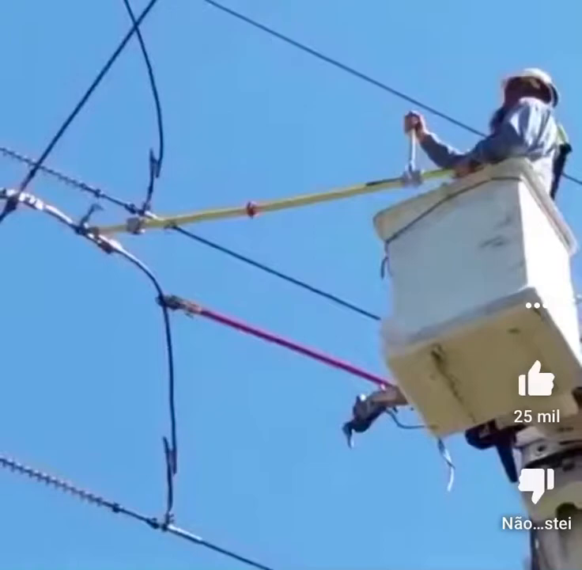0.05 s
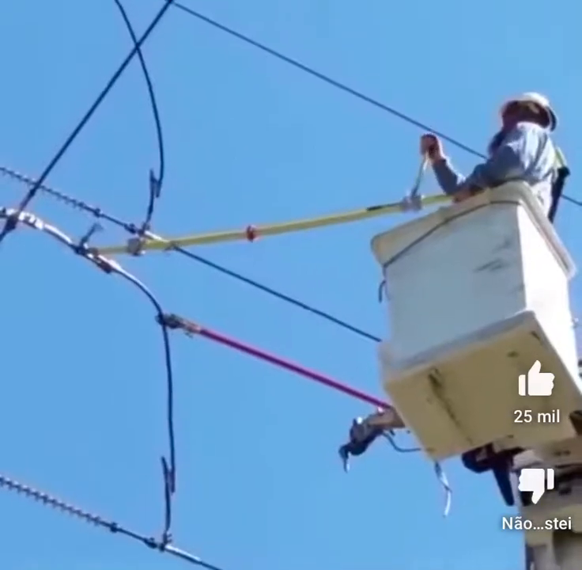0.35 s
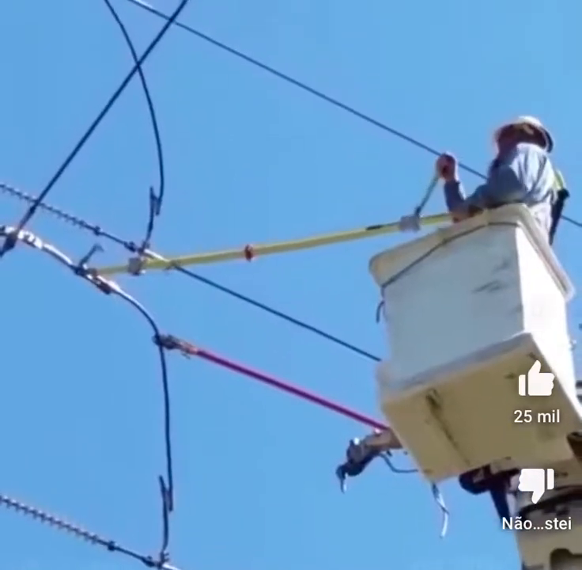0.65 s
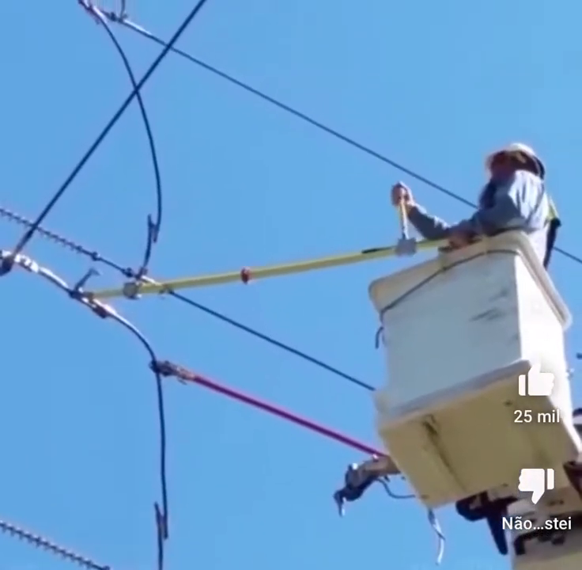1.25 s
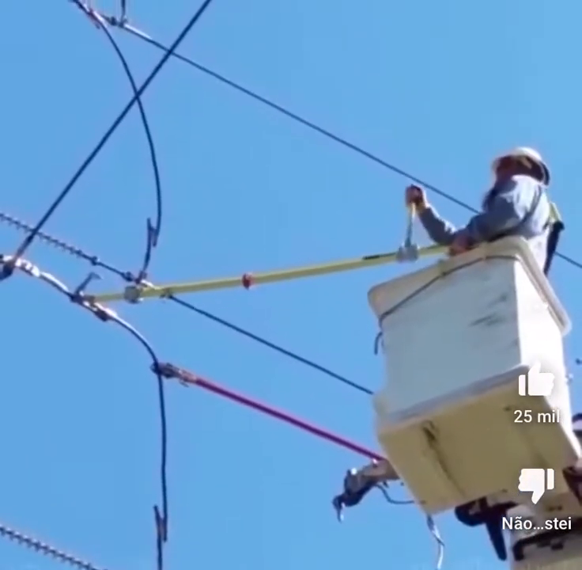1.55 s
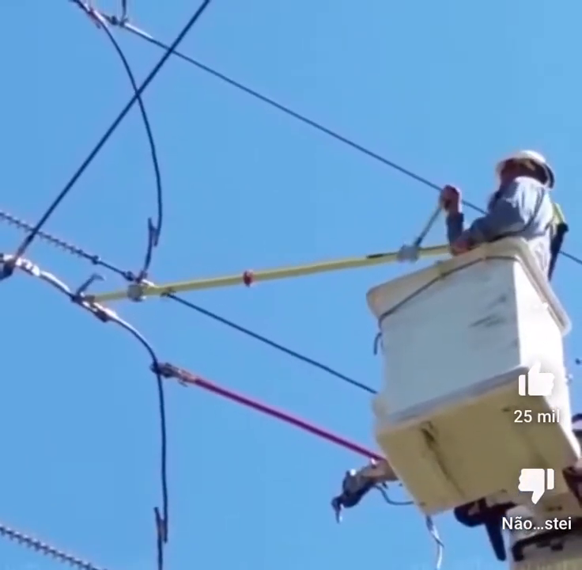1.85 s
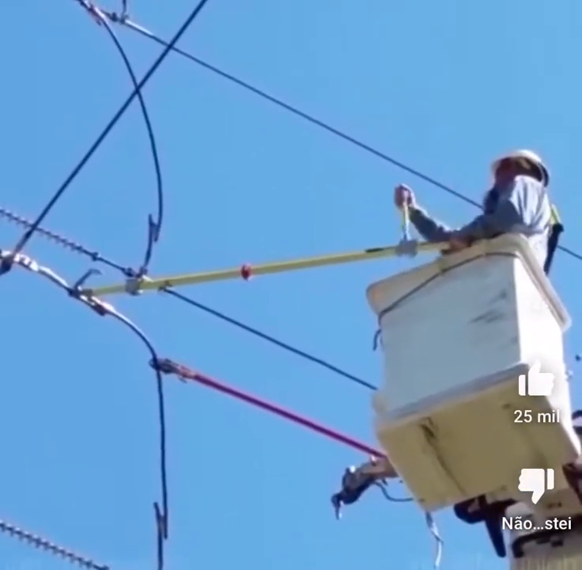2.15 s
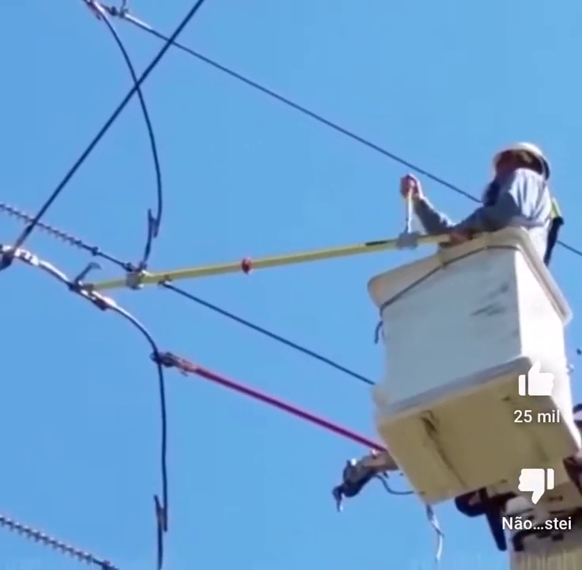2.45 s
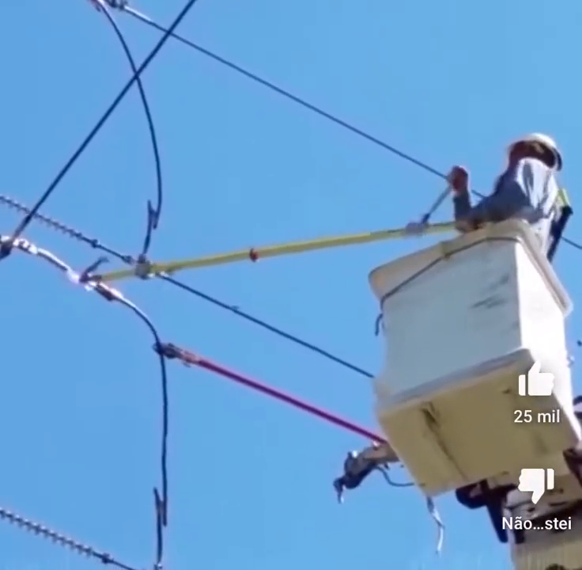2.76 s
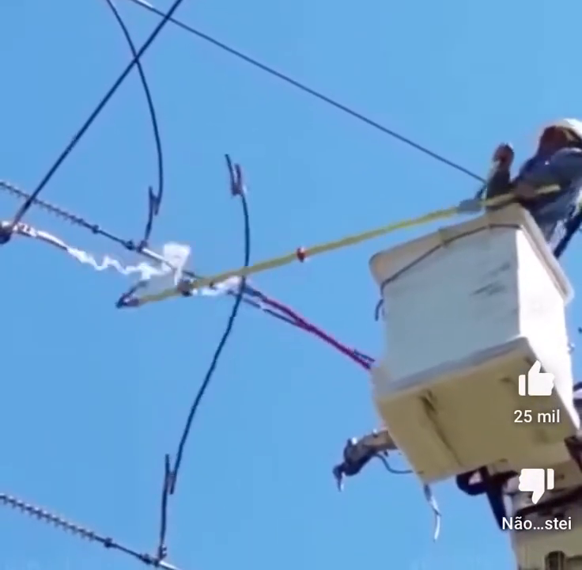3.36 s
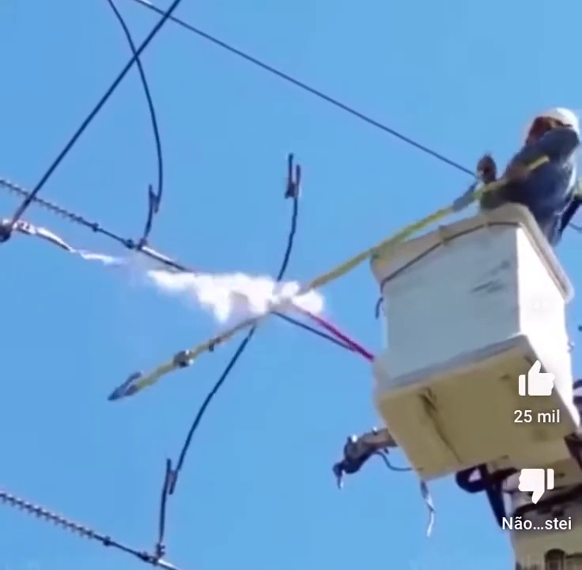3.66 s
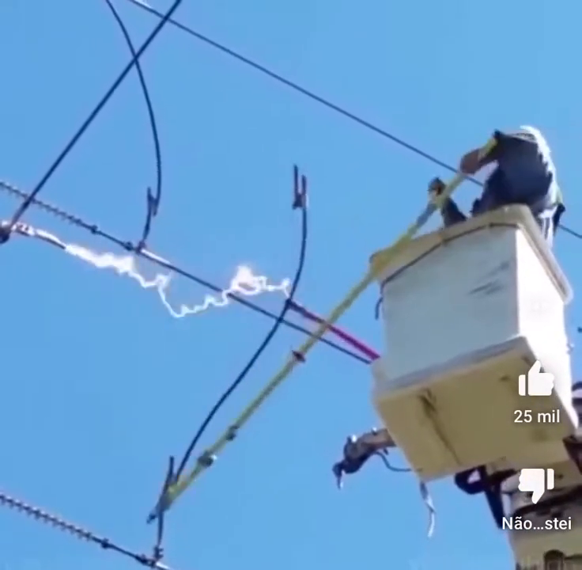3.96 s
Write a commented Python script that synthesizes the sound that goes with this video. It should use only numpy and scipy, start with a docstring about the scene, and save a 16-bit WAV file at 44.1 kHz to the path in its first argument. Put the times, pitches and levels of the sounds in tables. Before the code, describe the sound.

A loud, crackling electric arc breaks out on a power line, heard from the street below. Before it come an idling truck's rumble, scattered sharp spark snaps and low wind bumps on the microphone; the rumble fades beneath the buzz.

```python
"""A truck's engine idles, a low pulsing rumble. From its bucket a lineman pulls open a live overhead
switch with a long pole: small sparks snap at the contact and wind bumps the microphone.
Then an arc catches with a growl and is drawn out, and the rumble recedes beneath it.
The arc re-strikes on every half cycle of the mains. Each strike heats the air into a pressure pulse,
and the buzz of these pulses spreads into a sizzle as the crooked channel lengthens."""
import sys
import numpy as np
from scipy import signal
from scipy.fft import rfft, irfft, next_fast_len
from scipy.io import wavfile
from scipy.ndimage import map_coordinates

SR = 44100
rng = np.random.default_rng(int(sys.argv[2]) if len(sys.argv) > 2 else 0)


def store_pcm(level_fs):
    """Save levels as 16-bit WAV."""
    pcm = np.round(np.clip(level_fs, -1, 1) * 32767).astype(np.int16)
    wavfile.write(sys.argv[1], SR, np.atleast_2d(pcm).T)


N = 176400

# Levels in the tables are relative; each source adds its own gain.
# Envelopes of the arc's four parts: t/s, hum/dB, buzz/dB, rasp/dB, sizzle/dB
ARC_LEVELS = [(2.93, -27.5, -53, -31, -46.5), (2.97, -22, -35.5, -47, -55),
              (3.005, -26.5, -21.5, -38.5, -72), (3.038, -22, -26, -31.5, -51),
              (3.052, -32, -29.5, -30.5, -27), (3.125, -37, -31.5, -25, -24.5),
              (3.168, -33, -32, -38, -29.5), (3.19, -49, -46, -43, -33.5),
              (3.265, -34.5, -35, -31.5, -27.5), (3.39, -36, -37, -33, -26.5),
              (3.54, -39, -34.5, -32.5, -23), (3.58, -45, -45, -37.5, -29.5),
              (3.68, -35, -48, -34.5, -26.5), (3.745, -30, -47, -31, -21),
              (3.81, -33.5, -40.5, -32.5, -24.5), (4, -33.5, -34.5, -34.5, -28)]
# The lengthening channel: t/s, advance of the strikes/ms, spread of arrivals/ms, polarity bias/dB
ARC_CHANNEL = [(2.96, 1, .6, 0), (3.046, 0, .6, 0), (3.12, 0, .85, 0), (3.28, 2.2, .95, 0),
               (3.52, 3.1, 1.1, 0), (3.62, 4.4, 1.7, 0), (3.74, 5, 1.6, .3), (3.8, 5.1, 1.7, 1.6),
               (4, 5.3, 2, .8)]
# Spectra of the arc's low, middle and high bands: f/Hz, level/dB
BUZZ_SPECTRUM = [(100, -62), (170, -7), (237, 4), (355, -3.5), (470, -6.5), (590, -9.5), (900, -12),
                 (1500, -21), (3000, -43)]
RASP_SPECTRUM = [(250, -7.5), (500, -6.5), (750, -6.5), (1450, -2), (2000, -5.5), (2500, -9), (3000, -22),
                 (4500, -26)]
SIZZLE_SPECTRUM = [(2000, -39), (3100, -13.5), (3900, -2.5), (4700, -1.5), (5500, -4), (6050, -12),
                   (6900, -4), (7600, -7.5), (8300, 4.5), (9000, 0.5), (9600, -6.5), (11200, 2.5),
                   (12200, -14)]
# The hardest strikes, which crack out of the sizzle: t/s, level/dB
HARD_STRIKES = [(3.0448, -5), (3.514, -12), (3.531, -12), (3.657, -14), (3.791, -10), (3.89, -13)]
# Stereo image of the discharges and their echoes: f/Hz, left-right correlation
ARC_CORRELATION = [(2400, .94), (2950, -.1), (3900, .7), (7200, .4), (9500, -.3), (11000, -.1)]
# Sparks at the contact, the last row an early strike of the catching arc: t/s, level/dB, midrange against
# treble/dB, decay time T60/s
SPARK_EVENTS = [(0.55, -37.5, -28, 0.072), (0.6531, -30.5, -25, 0.041), (1.0482, -26, -16, 0.031),
                (1.0595, -29.5, -14, 0.025), (1.1863, -30.5, -15.5, 0.072), (1.8326, -28.5, -10, 0.037),
                (1.842, -32, -11, .018), (1.876, -34, -11, 0.095), (2.2664, -24.5, -8, 0.021),
                (2.3274, -23.5, -13, 0.03), (2.782, -36.5, -11, 0.18), (2.8213, -29, -12, 0.022),
                (2.854, -32.5, -6.5, 0.12), (2.878, -26, -9.5, 0.081), (2.892, -24, -12, 0.1),
                (2.9274, -35.5, 5.5, 0.028), (3.019, -24, -14, 0.0068)]
# Spectra of a spark's treble snap and midrange body: f/Hz, level/dB
SNAP_SPECTRUM = [(1800, -43), (3000, -1.5), (4700, 0.5), (6200, -8.5), (7800, -2.5), (8600, 7.5), (9800, 2),
                 (11200, -4.5), (12500, -6)]
BODY_SPECTRUM = [(300, -29), (700, -10), (1900, -1.5), (2800, -9), (4000, -39)]
# Gusts at the microphone: t/s, level/dB
GUST_LEVELS = [(2.1, -41), (2.25, -34), (2.29, -20), (2.32, -45), (2.36, -21.5), (2.40, -45), (2.46, -22),
               (2.55, -30), (2.64, -35.5), (2.71, -23.5), (2.75, -15.5), (2.775, -30.5), (2.83, -28.5),
               (2.9, -24), (3.02, -51), (3.3, -38.5), (3.4, -76)]
# Spectrum of the wind: f/Hz, level/dB
WIND_SPECTRUM = [(15, 1.5), (35, -10), (75, 6.5), (130, -2), (250, -9), (500, -44), (1500, -61)]
# Envelope of the engine, receding under the arc: t/s, level/dB
ENGINE_LEVELS = [(0, 1.5), (2.5, 0.5), (2.9, -1.5), (3.02, 2.5), (3.07, -18), (4, -21)]
# Exhaust tones: multiple of the firing rate, level/dB
EXHAUST_HARMONICS = [(2, -34), (3, -37.5), (4, -43.5), (5, -47.5)]
# Spectrum of the engine's noise: f/Hz, level/dB
CLATTER_SPECTRUM = [(25, -18), (55, -3.5), (120, -7.5), (200, -13), (420, -20.5), (700, -18), (950, -22),
                    (1150, -21.5), (2000, -28), (2600, -35), (3700, -39.5), (6500, -48), (9200, -54),
                    (10400, -40.5), (12000, -56)]
# Stereo image of the engine's noise: f/Hz, left-right correlation
CLATTER_CORRELATION = [(440, .9), (700, .7), (1050, .1), (1500, -.8), (2200, .62), (2900, -.8), (3900, .45),
                       (5000, 0)]

CATCH_S, CATCH_RISE_S = 2.9, 0.014
STRIKE_S, STRIKE_HZ = 3.0457, 118.5  # first full strike, nominal re-strike rate


def arc():
    """Thermal expansion: each strike pushes the air (hum, buzz) and cracks along it (rasp, sizzle)."""
    k, times = strikes()
    t = np.arange(N) / SR
    hum_db, buzz_db, rasp_db, sizzle_db = curves(ARC_LEVELS)
    alight = np.clip((t - CATCH_S) / CATCH_RISE_S, 0, 1)
    burn = lambda x, db: alight * amp(db) * x / np.std(x[..., t > STRIKE_S])
    hum = burn(-np.sin(2 * np.pi * np.interp(t, times, k)), hum_db - 5.5)
    buzz = burn(coloured(heat_pulses(k, times), BUZZ_SPECTRUM), buzz_db - 3)
    coarse = np.array([kink_clicks(k, times, writhe=0.095, jitter=0.095, count=40) for _ in range(2)])
    fine = np.array([kink_clicks(k, times, writhe=0.043, jitter=0.025, count=60) for _ in range(2)])
    rasp = burn(stereo(coloured(coarse, RASP_SPECTRUM), ARC_CORRELATION), rasp_db + 0.5)
    sizzle = burn(stereo(coloured(fine, SIZZLE_SPECTRUM), ARC_CORRELATION), sizzle_db)
    crack_times, crack_db = np.transpose(HARD_STRIKES)
    cracks = coloured(bursts(crack_times, crack_db - 1, rise_s=0.00068, t60_s=.01), SIZZLE_SPECTRUM)
    crackle = street_echoes(rasp + sizzle + cracks, wet_db=-3)
    return hum + buzz + patchy(crackle, depth_db=1.8, bins=9)


def strikes():
    """Re-ignition: index and time of each half cycle's strike; a longer arc is less punctual."""
    k = np.arange(-20, 120)
    times = STRIKE_S + k / STRIKE_HZ
    early_ms, spread_ms, _ = curves(ARC_CHANNEL, times)
    stray_ms = .6 * np.maximum(spread_ms - 1, 0) * rng.standard_normal(len(k))
    return k, times + (stray_ms - early_ms) / 1000


def heat_pulses(k, times):
    """Sudden heating radiates one pressure pulse a strike, wider as the channel lengthens."""
    spread_s = curves(ARC_CHANNEL, times)[1] / 1000
    jitter_s = .28 * spread_s * np.clip(k / 30, .4, 1)
    when = times + jitter_s * rng.standard_normal(len(k))
    size = -amp(1.2 * rng.standard_normal(len(k)))
    smear_s = .4 * spread_s
    return clicks(when - smear_s, size) + clicks(when, 2 * size) + clicks(when + smear_s, size)


def kink_clicks(k, times, writhe, jitter, count):
    """Superposition: each kink clicks with its own delay; kinks drift, so successive strikes are alike."""
    def drift():
        noise = rng.standard_normal((count, len(k) + 23))
        return unit(signal.fftconvolve(noise, np.hanning(24)[None], "valid"))
    _, spread_ms, polarity_db = curves(ARC_CHANNEL, times)
    place = rng.standard_normal((count, 1)) + writhe * drift()
    delay_ms = spread_ms * (place + jitter * rng.standard_normal(place.shape))
    scatter_db = 3.5 * rng.standard_normal(place.shape)
    flicker_db = 1.6 * rng.standard_normal(len(k))
    size_db = scatter_db + flicker_db - polarity_db * (-1.) ** k
    return clicks(times + delay_ms / 1000, np.tanh(2 * drift()) * amp(size_db))


def sparks(rise_s=0.00055):
    """Dielectric breakdown: the air snaps as the pole's hook works at the live contact, and once more as the
    catching arc strikes early."""
    times, db, body_db, t60_s = np.transpose(SPARK_EVENTS)
    snap = coloured(bursts(times, db - 2, rise_s, t60_s), SNAP_SPECTRUM)
    body = coloured(bursts(times, db + body_db + 1, rise_s, t60_s), BODY_SPECTRUM)
    return street_echoes(snap + body, wet_db=-7)


def wind():
    """Turbulence: pressure fluctuations at the microphone make low bumps."""
    level_db, = curves(GUST_LEVELS)
    turbulence = coloured(rng.standard_normal((2, N)), WIND_SPECTRUM)
    return amp(level_db) * stereo(turbulence, correlation=[(60, 0.23)])


def engine(firing_hz=30.87):
    """Periodic excitation: the idling truck's firings give exhaust harmonics and modulate its noise."""
    level_db, = curves(ENGINE_LEVELS)
    phase = 2 * np.pi * np.cumsum(firing_hz * (1 + 0.01566 * wobble(9))) / SR
    exhaust = np.zeros(N)
    for harmonic, db in EXHAUST_HARMONICS:
        peak = np.sqrt(2) * amp(db - 3 + 2.2 * wobble(13))
        exhaust += peak * np.cos(harmonic * phase + rng.uniform(0, 2 * np.pi))
    noise = stereo(coloured(rng.standard_normal((2, N)), CLATTER_SPECTRUM), CLATTER_CORRELATION)
    clatter = patchy(noise, depth_db=1.5, bins=11) * amp(-33.5 + 0.8 * wobble(7.28))
    pulsing = 1 + 0.098 * np.cos(phase)
    return amp(level_db) * (exhaust + clatter * pulsing)


def street_echoes(x, wet_db, near_t60_s=0.034, far_t60_s=0.43):
    """Reflection: the truck and the ground add quick echoes, followed by a faint longer tail."""
    t = np.arange(SR // 2) / SR
    decay = amp(-60 * t / near_t60_s) + amp(-12.5 - 60 * t / far_t60_s)
    tail = stereo(rng.standard_normal((2, N)), ARC_CORRELATION)[:, :len(t)] * decay * (t > .003)
    return x + amp(wet_db) * signal.fftconvolve(x, tail / np.linalg.norm(tail[0]), axes=1)[:, :N]


def bursts(times, levels_db, rise_s, t60_s):
    """Exponential decay: a ragged puff of stereo noise dies away from each onset."""
    age = np.maximum(np.arange(N) / SR - times[:, None], 0)
    fall_db = np.minimum(60 * age / np.reshape(t60_s, (-1, 1)), 200)
    envelopes = (1 - np.exp(-age / rise_s)) * amp(levels_db[:, None] - fall_db)
    ragged_db = 4 * map_coordinates(rng.standard_normal(N // 64), [np.arange(N) / 80], order=1)
    return envelopes.sum(0) * unit(amp(ragged_db)) * stereo(rng.standard_normal((2, N)), ARC_CORRELATION)


def clicks(times, sizes):
    """Sinc interpolation places impulses between samples."""
    at = times.reshape(-1, 1) * SR
    taps = np.floor(at).astype(int) + np.arange(-7, 9)
    kernel = np.sinc(taps - at) * np.sinc((taps - at) / 8)
    return np.bincount(taps.ravel(), (kernel * sizes.reshape(-1, 1)).ravel(), N)[:N]


def patchy(x, depth_db, bins):
    """Spectral modulation: the colour wanders in random patches of frequency and time."""
    spectra = signal.stft(x, nperseg=512)[2]
    patch = np.outer(np.hanning(bins), np.hanning(34))
    field = signal.fftconvolve(rng.standard_normal(spectra.shape[1:]), patch, "same")
    gain = amp(depth_db * unit(field))
    gain[:8] = 1  # the bass stays steady
    return signal.istft(spectra * unit(gain), nperseg=512)[1][:, :N]


def stereo(pair, correlation):
    """Mid-side mixing gives two independent signals a set correlation, at rms 1."""
    angle = lambda hz: np.arccos(np.clip(along(correlation, hz), -1, 1)) / 2
    mid, side = filtered(pair, lambda hz: np.array([np.cos(angle(hz)), np.sin(angle(hz))]))
    return unit(np.array([mid + side, mid - side]))


def coloured(x, spectrum):
    """Minimum-phase filtering shapes x causally and keeps the power of white noise."""
    def response(hz):
        magnitude = np.maximum(unit(amp(along(spectrum, hz))), 1e-6)
        cepstrum = irfft(np.log(magnitude))
        half = len(cepstrum) // 2
        return np.exp(rfft(np.r_[cepstrum[0], 2 * cepstrum[1:half], cepstrum[half], np.zeros(half - 1)]))
    return filtered(x, response)


def filtered(x, response):
    """Convolution theorem: the spectrum of x is multiplied by a frequency response."""
    size = 2 * next_fast_len(N * 2 // 3)
    return irfft(rfft(x, size) * response(np.fft.rfftfreq(size, 1 / SR)), size)[..., :N]


def wobble(rate):
    """A spline through random knots, rate of them a second."""
    return map_coordinates(rng.standard_normal(256), [np.arange(N) * rate / SR], mode="mirror")


def curves(rows, t=None):
    """Each column after the time, interpolated at times t or at every sample."""
    times, *columns = np.transpose(rows)
    return [np.interp(np.arange(N) / SR if t is None else t, times, column) for column in columns]


def along(points, hz):
    """Points (f/Hz, value) interpolated on a logarithmic frequency axis."""
    f, values = np.transpose(points)
    return np.interp(np.log(hz + 1), np.log(f + 1), values)


def amp(db):
    """Decibels to amplitude ratio."""
    return 10 ** (np.asarray(db) / 20)


def unit(x):
    """Normalisation to rms 1."""
    return x / np.sqrt(np.mean(x ** 2) + 1e-20)


def scene():
    """Superposition of engine, wind, sparks and arc, heard from the street below."""
    return engine() + wind() + sparks() + arc()


def record(dry, start_s=.072, top_hz=11850):
    """Gating and band limiting: the sound starts abruptly and its top treble is cut off steeply."""
    gate = np.arange(N) / SR > start_s
    return filtered(dry * gate, lambda hz: 1 / np.sqrt(1 + (hz / top_hz) ** 160))


dry = scene()
out = record(dry)
store_pcm(out)
```